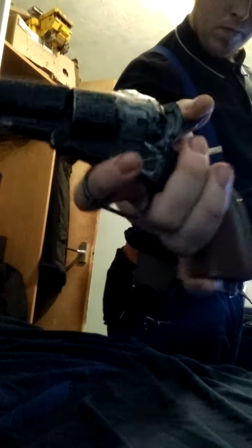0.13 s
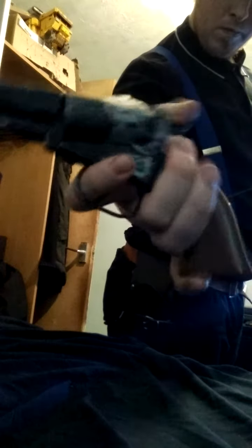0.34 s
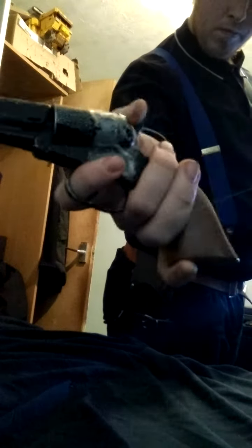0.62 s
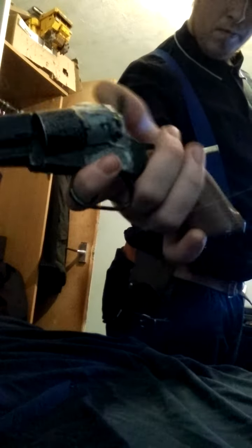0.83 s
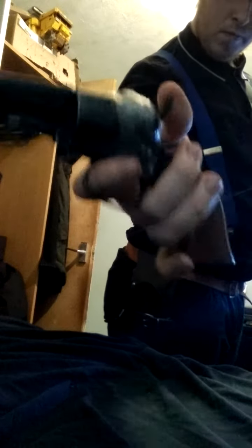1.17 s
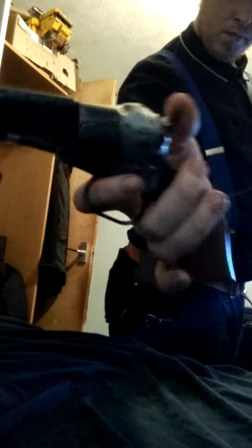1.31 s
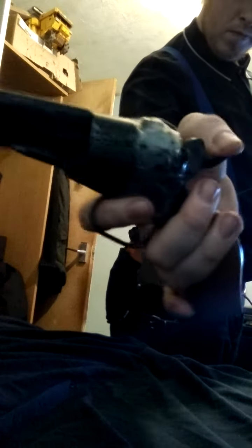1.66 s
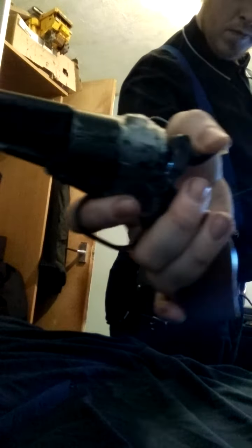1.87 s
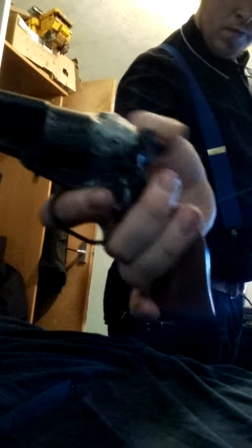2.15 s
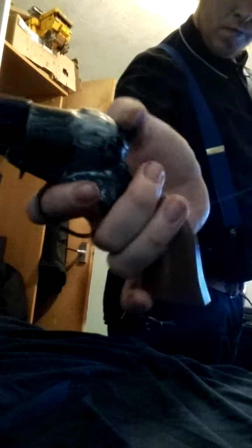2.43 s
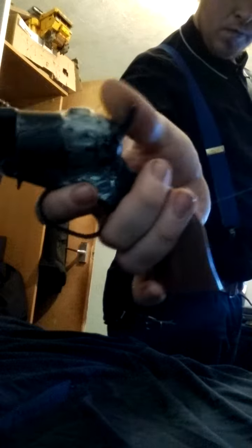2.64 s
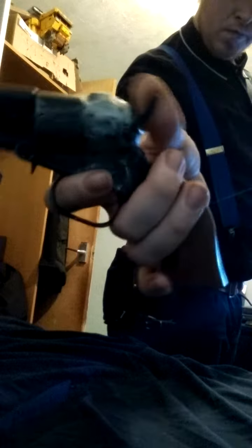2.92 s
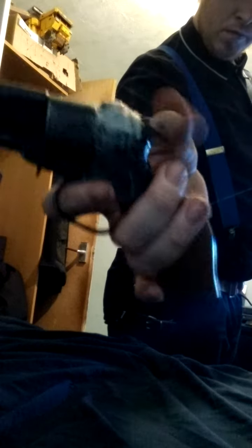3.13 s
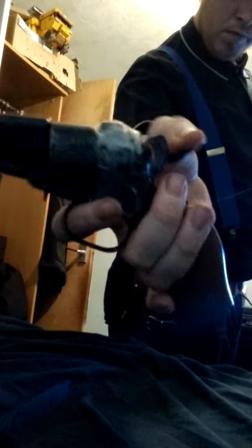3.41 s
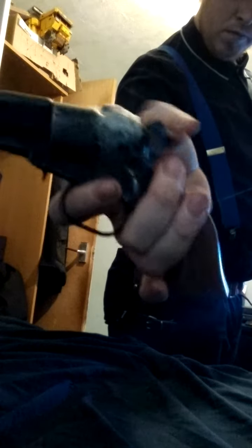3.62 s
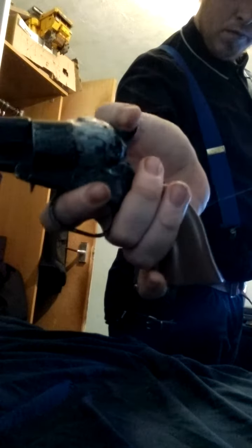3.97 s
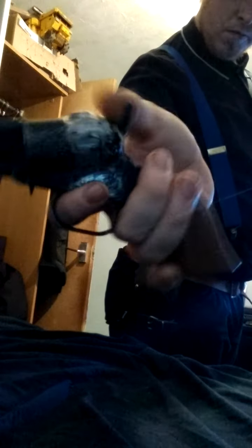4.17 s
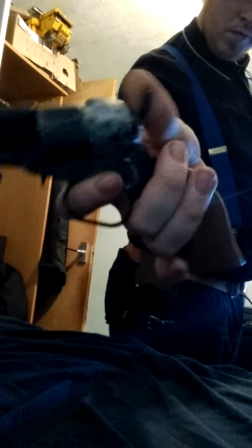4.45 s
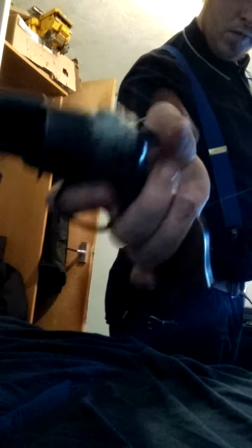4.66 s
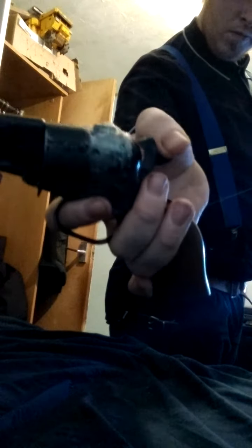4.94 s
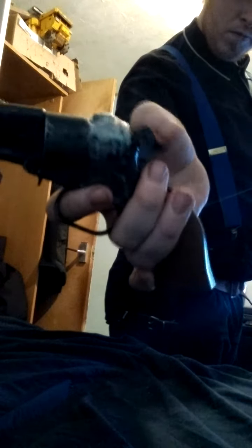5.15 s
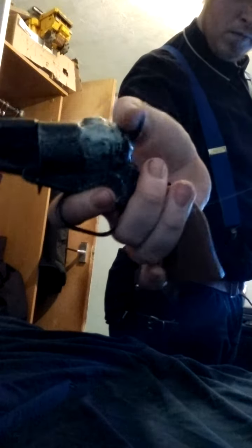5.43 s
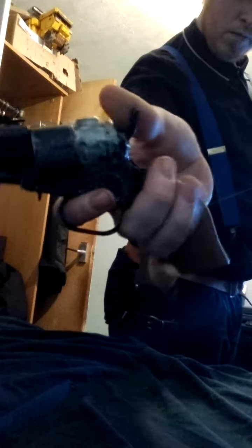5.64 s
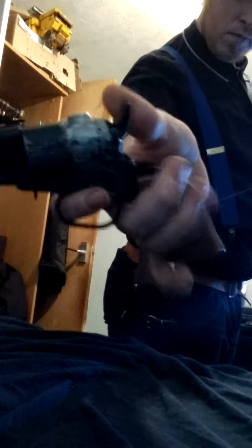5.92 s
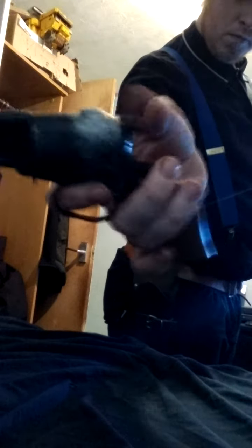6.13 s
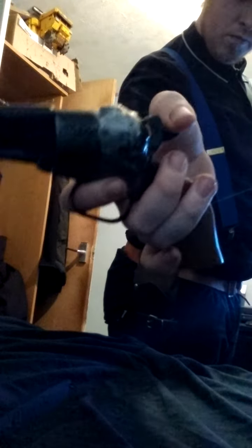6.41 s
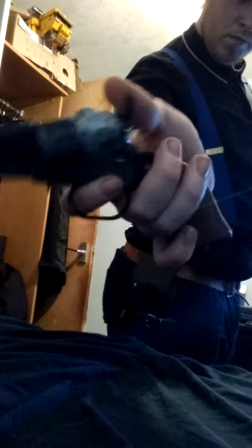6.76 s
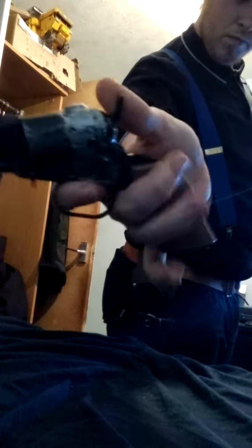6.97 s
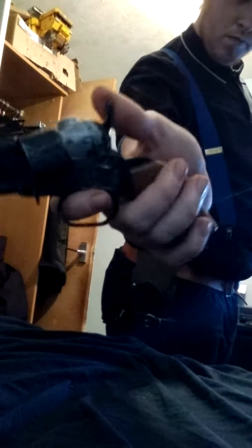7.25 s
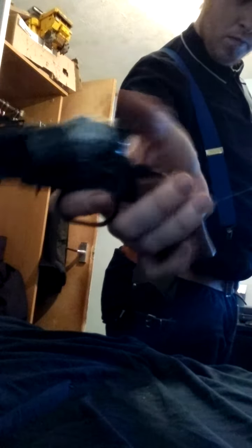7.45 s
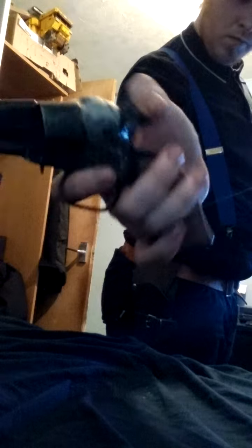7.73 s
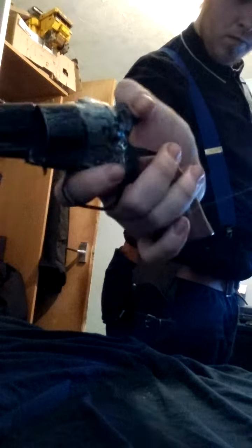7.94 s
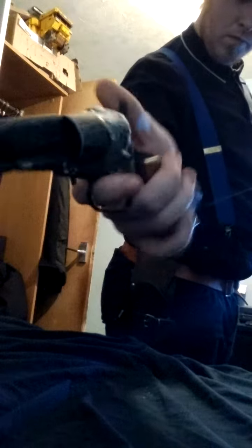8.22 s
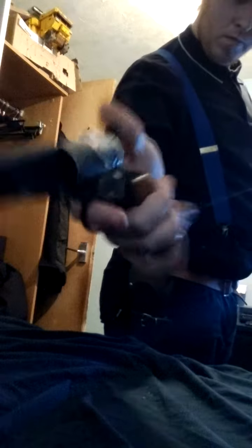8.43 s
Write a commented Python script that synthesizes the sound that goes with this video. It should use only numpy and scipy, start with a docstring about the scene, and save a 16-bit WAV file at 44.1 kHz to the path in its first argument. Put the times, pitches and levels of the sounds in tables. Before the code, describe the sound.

A metal toy revolver is cocked and dry-fired close to the microphone, slightly to the right, in a small bedroom. Faint cocking clicks lead to sharp snaps at 0.6 and 0.8 seconds. The hammer is cocked again at about 1.6, 3.2, 4.7, 6.2 and 7.5 seconds, each time a quick cluster of lighter clicks with a tiny scrape of the cylinder; the one at 3.2 ends in a hard click. Hard, briefly ringing snaps fall at 2.2 and 2.6, loudly at 3.9, then at 4.2 and 5.3, with softer ones at 2.4 and 5.5. A rapid triple snap comes around 6.7 and a loud double snap at 8.1. Light ticks of loose parts are scattered between. A faint fan hum and hiss run throughout, dipping after loud snaps and swelling back.

```python
"""Toy revolver dry-fired in a bedroom

A metal toy revolver, close to a stereo pair in a small bedroom, is cocked and dry-fired again and again.
Pawl, cylinder and hammer click and scrape, and each contact rings the cast frame briefly.
A fan hums in the background. The recorder's gain control ducks on the loud snaps
and lets the room noise swell back."""
import sys
import numpy as np
from scipy import signal
from scipy.fft import rfft, irfft
from scipy.io import wavfile
from scipy.ndimage import uniform_filter1d, minimum_filter1d

SR = 44100
rng = np.random.default_rng(int(sys.argv[2]) if len(sys.argv) > 2 else 0)


def to_wav(sig):
    """Store sig (one row per channel, or 1-D mono) as 16-bit WAV at the path in sys.argv[1].

    Samples outside -1..1 are clipped; the rate is SR.
    """
    pcm = np.clip(np.atleast_2d(sig), -1, 1) * 32767
    pcm = np.round(pcm).astype(np.int16)
    wavfile.write(sys.argv[1], SR, pcm.T)  # frames by channels


N = 378378

# the gun's knock, clack, snap and edge registers at the microphones:
# low/Hz, high/Hz, left lag/ms, left-right likeness, left minus right/dB
REGISTERS = [(190, 2100, -.03, .85, -2.5), (2700, 4300, -.025, .65, -3), (4700, 11000, -.09, .7, -7.5),
             (11000, 14400, .3, .6, -14)]
# hard snaps of hammer and trigger: t/s, level/dB, then knock/dB, clack/dB, edge/dB re the snap register
SNAPS = [(0.5521, -2, -19.5, -16.5, -2), (0.7908, -5, -15, -9, -10), (2.17, -8, -23.5, -2.5, 1.5),
         (2.3794, -14.5, -13.5, -9.5, -11), (2.5953, -3.5, -12, -15, -1), (3.9466, 3, -20, -13, 1.5),
         (4.2134, -8, -11.5, -10.5, -9), (5.327, -2.5, -19.5, -9, 3), (5.5392, -12.5, -11.5, -18, -8),
         (6.6778, -9.5, -24.5, -7.5, -2.5), (6.7412, -9, -16.5, -0.5, -14), (6.7904, 0.5, -13, -15.5, 0.5),
         (8.0952, 5.5, -17.5, -10.5, -11.5), (8.1304, 1.2, -15, -29.5, -6)]
# the thumb cocks the hammer: take-up t/s, level/dB, stroke t/s, level/dB, catch t/s, level/dB
COCKINGS = [(0.4271, -31.5, 0.509, -40, 0.5278, -41), (1.5431, -29, 1.5841, -22, 1.6095, -16),
            (3.1735, -28, 3.2051, -27, 3.2291, -6.5), (4.6983, -36, 4.7441, -24.5, 4.7761, -17),
            (6.1391, -26, 6.1786, -23, 6.2145, -19.5), (7.498, -28, 7.5173, -26, 7.5731, -19)]
# colours of the lighter contacts: knock/dB, clack/dB, edge/dB re the snap register
TAKE_UP_COLOUR, PAWL_COLOUR = (0.97, 3.7, -10), (-4.5, 0.97, -16.5)
CATCH_COLOUR, TICK_COLOUR = (-1, 1.3, -0.5), (-9.5, -4.5, -7)


def from_db(db):
    """Decibels to gain."""
    return 10 ** (np.asarray(db) / 20)


def unit_energy(x):
    """Scale so that the squares sum to one."""
    return x / np.sqrt(np.sum(x ** 2, axis=-1, keepdims=True) + 1e-20)


def band(x, low_hz, high_hz, order):
    """Causal band-pass."""
    return signal.sosfilt(signal.butter(order, [low_hz, high_hz], "band", fs=SR, output="sos"), x)


def over_bins(points, column=1):
    """One column of a spectrum table on the FFT grid, joined on a log-frequency axis."""
    table = np.array(points, float)
    return np.interp(np.log(np.arange(N // 2 + 1) * SR / N + 1), np.log(table[:, 0]), table[:, column])


def noise_pair():
    """Spectra of two independent white noises at 0 dB per Hz."""
    return rfft(rng.standard_normal((2, N))) * np.sqrt(SR / 2)


def add(track, sound, s):
    """Mix a sound into a track at a time."""
    at = int(round(s * SR))
    track[at:at + len(sound)] += sound[:N - at]


def fan_rumble():
    """Low rush of fan and room, partly shared by the two microphones."""
    # rumble spectrum: f/Hz, density/(dB per Hz)
    rumble = [(12, -77), (35, -78), (58, -77), (110, -84), (220, -88), (400, -90), (700, -95.5),
              (1300, -100), (3000, -107), (8000, -121)]
    # how alike the microphones hear it: f/Hz, likeness (clipped to -1..1 below)
    likeness = [(60, -0.5), (150, -0.7), (380, -0.4), (950, 0.8), (2400, -1.2), (6000, -0.4)]
    alike = np.clip(over_bins(likeness), -1, 1)
    mid, side = noise_pair() * np.sqrt([(1 + alike) / 2, (1 - alike) / 2])
    return irfft(from_db(over_bins(rumble)) * np.array([mid + side, mid - side]), N)


def microphone_hiss():
    """Each microphone's own noise."""
    # noise floor: f/Hz, left/(dB per Hz), right/(dB per Hz)
    floor = [(300, -108, -108), (1700, -108, -108), (3130, -103, -102.5), (6500, -110, -106),
             (10800, -110, -105.5), (12000, -120, -108.5), (14300, -120, -109), (15300, -114, -107),
             (16100, -130, -125)]
    return irfft(noise_pair() * from_db([over_bins(floor, 1), over_bins(floor, 2)]), N)


def hum(left_db=-4.5):
    """Fan, motor and electronics hum and whine: narrow bands of noise heard as wavering tones."""
    # steady tones: f/Hz, level on the right/dB, half-width/Hz
    tones = [(59, -62, 2), (312, -70, .7), (575, -79, 2), (1247, -81, 1), (7900, -81, 60), (15000, -73, 4)]
    bins_hz = np.arange(N // 2 + 1) * SR / N
    lines = sum(from_db(db) * unit_energy(1 / (1 + ((bins_hz - hz) / width) ** 2))
                for hz, db, width in tones)
    return irfft(lines * np.sqrt(N / SR) * noise_pair() * from_db([[left_db], [0]]), N)


def room_tails(build_s=0.0005, first_s=0.0015):
    """A short diffuse stereo tail per register, smooth in colour as it gathers all sides of the gun."""
    # the room's decay in each register: level/dB, t60/s, left minus right/dB
    decays = [(-17, 0.17, 0), (-16, 0.14, 1), (-16, 0.12, -7), (-20.5, 0.085, -7)]
    # what the gun radiates, averaged over all directions: f/Hz, level/dB
    radiated = [(100, -12), (350, -6), (560, 0), (800, -4), (1200, -3), (1620, 1), (2350, -8), (3500, 0),
                (4550, -6), (5350, 0), (7000, -2), (8700, 2), (12000, -4), (16000, -6)]
    t = np.arange(SR // 3) / SR
    onset = 1 - np.exp(-np.maximum(t - first_s, 0) / build_s)
    diffuse = irfft(noise_pair() * from_db(over_bins(radiated)), N)[:, :len(t)]
    tails = []
    for (db, t60, left_db), (low, high, *_) in zip(decays, REGISTERS):
        tail = band(diffuse, low, high, order=3) * onset * from_db(-60 * t / t60)
        tails.append(from_db([[db + left_db], [db]]) * unit_energy(tail))
    return np.array(tails)


def bedroom(contacts, clicking, sliding, sliding_db=-21.0, ceiling_s=0.0065, ceiling_db=-22.5):
    """The clicks echo once off the ceiling, and every contact and scrape sets off the room's tails."""
    tails = room_tails()
    out = from_db(sliding_db) * signal.fftconvolve(sliding[1:], tails.sum(axis=0), axes=1)[:, :N]
    for channel in range(2):
        add(out[channel], from_db(ceiling_db) * clicking[channel], ceiling_s)
        for s, *levels in contacts:
            add(out[channel], register_gains(*levels) @ tails[:, channel], s)
    return out


def frame_ring(spread_db=6.0, detune=0.016):
    """The cast frame rings; strike point and grip vary each mode's strength and the damped ones' pitch."""
    # modes of the frame: f/Hz, level/dB, t60/s
    modes = [(268, -20, 0.0055), (627, -18, 0.02), (620, -9, 0.0028), (1100, -4, 0.0081), (1546, -3, 0.011),
             (1620, -18.5, 0.07), (1790, -3.5, 0.0076), (3135, -3.5, 0.0073), (3398, -6.5, 0.01),
             (3514, 7, 0.0039), (3380, -28.5, 0.041), (3770, -5.5, 0.0012), (5480, 0, 0.0079),
             (5100, -23.5, 0.03), (6250, -2, 0.0061), (7570, 8.5, 0.0009), (8480, -21.5, 0.045),
             (8620, 9, 0.0017), (10600, 0, 0.0023), (10650, 1, 0.0004), (13000, -9, 0.00067),
             (14500, 2, 0.00053)]
    hz, db, t60 = np.transpose(modes)[:, :, None]
    t = np.arange(SR // 12) / SR
    strength, shift = rng.standard_normal((2, len(modes), 1))
    damping = t60.min() / t60
    signs = rng.choice([-1, 1], (len(modes), 1))
    swing = np.cos(2 * np.pi * hz * (1 + detune * damping * shift) * t)
    return np.sum(signs * from_db(db + spread_db * strength - 60 * t / t60) * swing, axis=0)


def sliding_parts(sear_s=0.004, slack_s=0.012, run_on_s=0.007):
    """Parts that slide under spring load, as rows of start/s, end/s, level/dB."""
    slides = [(s - sear_s, s, db - 34.5) for s, db, *_ in SNAPS]  # the sear drags before it lets go
    for take_up, take_up_db, stroke, stroke_db, catch, _ in COCKINGS:
        slides.append((take_up, take_up + slack_s, take_up_db - 16))  # the slack rubs
        slides.append((stroke, catch + run_on_s, stroke_db - 13.5))  # the cylinder turns
    return slides


def scrapes(slides, slips_per_s=3000, uneven_db=6.0, left_db=-6.0, grip_hz=560, grip_db=-15):
    """Rough cast faces stick and slip: dense tiny contacts ring the frame and the hollow grip."""
    out = np.zeros((2, N))
    grip = signal.iirpeak(grip_hz, Q=10, fs=SR)
    for start, end, db in slides:
        length = int((end - start) * SR)
        slipping = rng.random(SR // 4)[:length] < slips_per_s / SR
        direction, size = rng.standard_normal((2, SR // 4))[:, :length]
        slips = slipping * np.sign(direction) * from_db(uneven_db * size)
        hollow = unit_energy(signal.lfilter(*grip, np.pad(slips, (0, SR // 20))))
        for track, side_db in zip(out, (left_db, 0)):
            ringing = signal.fftconvolve(slips, frame_ring())
            metal = unit_energy(band(ringing, low_hz=500, high_hz=9500, order=1))
            add(track, metal * np.sqrt(length) * from_db(db + side_db), start)
            add(track, hollow * np.sqrt(length) * from_db(db + grip_db), start)
    return out


def touch(s, db, colour, bright_db=0):
    """One light contact as a row like those of SNAPS; brightness tilts its colour from knock to edge."""
    knock, clack, edge = colour
    return s, db, knock - bright_db, clack - 0.7 * bright_db, edge + 0.25 * bright_db


def light_ticks():
    """The trigger and loose parts tick lightly."""
    # ticks: t/s, level/dB, brightness/dB
    ticks = [(0.0755, -30.5, 20), (0.7536, -34.5, 14), (2.3666, -36, -3), (3.3167, -29, 17),
             (3.7552, -46.5, -11), (5.2535, -42.5, -19), (5.3034, -41, -7.5), (5.976, -47, -14),
             (6.6467, -47, -14.5), (7.317, -29, 14.5), (7.7345, -43, 1.5), (7.8894, -48, -2.5),
             (7.949, -42.5, 2), (8.0046, -39, 1.5), (8.0556, -38, -0.5), (8.0744, -33.5, -6),
             (8.2984, -30, 4)]
    return [touch(s, db, TICK_COLOUR, bright_db) for s, db, bright_db in ticks]


def trigger_creaks(within_s=0.033, db=-48, spread_db=3.5):
    """The squeezed trigger creaks faintly at a chance moment just ahead of each snap."""
    return [touch(s - within_s * rng.random(), db - spread_db * rng.standard_normal(),
                  TICK_COLOUR, bright_db=-6.5) for s, *_ in SNAPS]


def cocking(take_up, take_up_db, stroke, stroke_db, catch, catch_db, rattle_s=0.0049, settle_s=0.013):
    """The slack closes and rattles, the pawl engages and passes a tooth, then the hammer catches."""
    tooth = stroke + 0.52 * (catch - stroke)
    return [touch(take_up, take_up_db, TAKE_UP_COLOUR),
            touch(take_up + rattle_s, take_up_db - 7.5, TAKE_UP_COLOUR, bright_db=10.5),
            touch(stroke, stroke_db, PAWL_COLOUR),
            touch(tooth, stroke_db - 0.5, PAWL_COLOUR, bright_db=5),
            touch(catch, catch_db, CATCH_COLOUR, bright_db=0.91 * (catch_db + 18.5)),  # harder is brighter
            touch(catch + settle_s, stroke_db - 9.5, TICK_COLOUR, bright_db=12)]  # the cylinder settles


def register_gains(db, knock, clack, edge):
    """Share a contact's level, taken as rms over a millisecond, among the four registers."""
    return unit_energy(from_db([knock, clack, 0, edge])) * from_db(db) * np.sqrt(2 * SR / 1000)


def impact(chatter_s=0.0007, chatter=0.86):
    """Metal meets metal: one sharp impulse and about a millisecond of chatter."""
    t = np.arange(SR // 200) / SR
    return unit_energy((t == 0) + chatter * rng.standard_normal(len(t)) * np.exp(-t / chatter_s))


def clicks(contacts):
    """Each contact rings the frame in its own colour and reaches the two close microphones unequally."""
    out = np.zeros((2, N))
    rings = np.array([frame_ring() for _ in contacts])
    registers = [band(rings, low, high, order=3) for low, high, *_ in REGISTERS]
    for k, (s, *levels) in enumerate(contacts):
        gains = register_gains(*levels)
        for ring, gain, (_, _, lag_ms, alike, side_db) in zip(registers, gains, REGISTERS):
            right_hit = impact()
            left_hit = alike * right_hit + (1 - alike) * impact()
            left, right = gain * unit_energy(from_db([side_db, 0]))
            add(out[0], left * unit_energy(np.convolve(ring[k], left_hit)), s + lag_ms / 1000)
            add(out[1], right * unit_energy(np.convolve(ring[k], right_hit)), s)
    return out


def scene():
    """The revolver close up and a little to the right, over the bedroom's room tone."""
    room_tone = fan_rumble() + microphone_hiss() + hum()
    cocking_contacts = [contact for row in COCKINGS for contact in cocking(*row)]
    contacts = list(SNAPS) + cocking_contacts + trigger_creaks() + light_ticks()
    sliding = scrapes(sliding_parts())
    clicking = clicks(contacts)
    return room_tone + bedroom(contacts, clicking, sliding) + sliding + clicking


def midrange_dip(x, dip_hz=2403, dip_db=-7):
    """The whole sound has a narrow dip near 2.4 kHz."""
    notched = signal.lfilter(*signal.iirnotch(dip_hz, Q=4.5, fs=SR), x)
    return notched + from_db(dip_db) * (x - notched)


def gain_control(x, threshold_db=-16.0, slope=0.72, most_cut_db=14.5, hold_s=0.28, release_db_per_s=11.5):
    """Loud snaps pull the recorder's gain down at once; it holds briefly and creeps back."""
    power = uniform_filter1d(np.mean(x ** 2, axis=0), size=64)
    level_db = 10 * np.log10(np.maximum(power, 1e-12))
    cut_db = np.clip(slope * (level_db - threshold_db), 0, most_cut_db)
    half_hold = int(hold_s * SR / 2)
    held = -minimum_filter1d(-cut_db, 2 * half_hold + 1, origin=half_hold, mode="constant")
    ramp = release_db_per_s * np.arange(N) / SR
    released = np.maximum.accumulate(held + ramp) - ramp
    gain_db = minimum_filter1d(-released, size=65)  # the gain falls just before the peak arrives
    return x * from_db(uniform_filter1d(gain_db, size=24))


def record(dry):
    """A midrange dip, gain control, faint converter hiss, overload at full scale and a steep top cut."""
    levelled = gain_control(midrange_dip(dry))
    converter_hiss = from_db(-118) * irfft(noise_pair(), N)
    top_cut = signal.cheby2(12, 70, 17000, fs=SR, output="sos")  # 70 dB down from 17 kHz
    return signal.sosfilt(top_cut, np.clip(levelled + converter_hiss, -1, 1))


dry = scene()
out = record(dry)
to_wav(out)
```